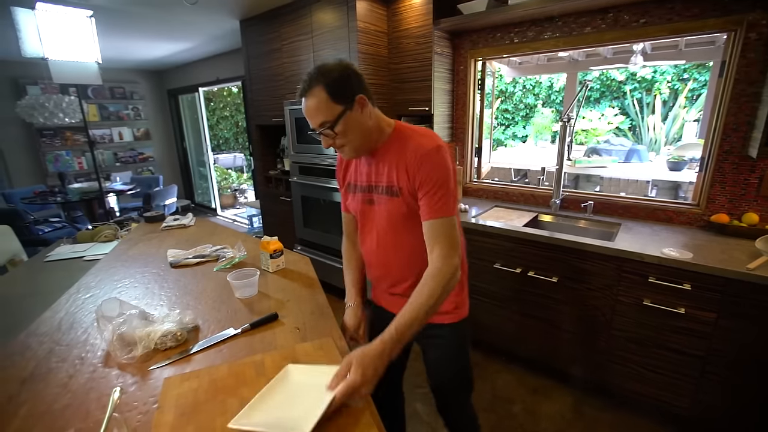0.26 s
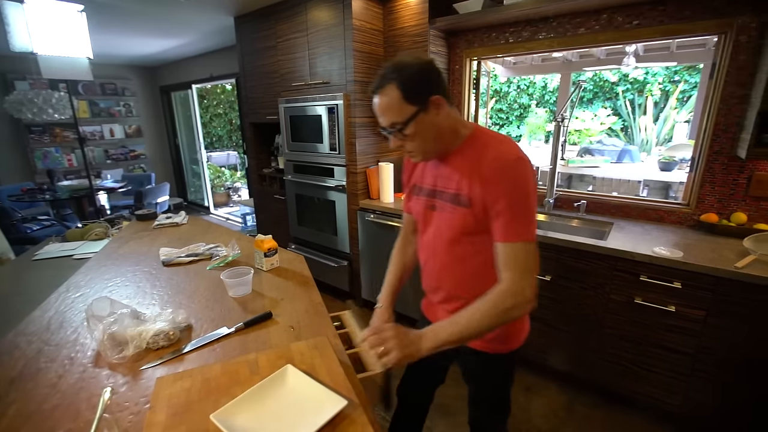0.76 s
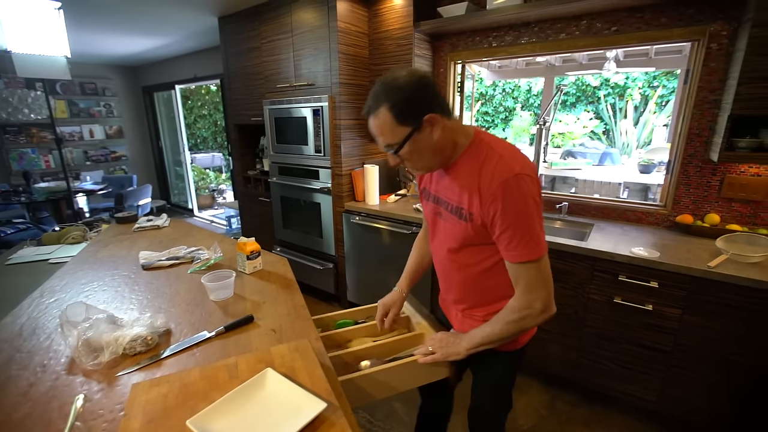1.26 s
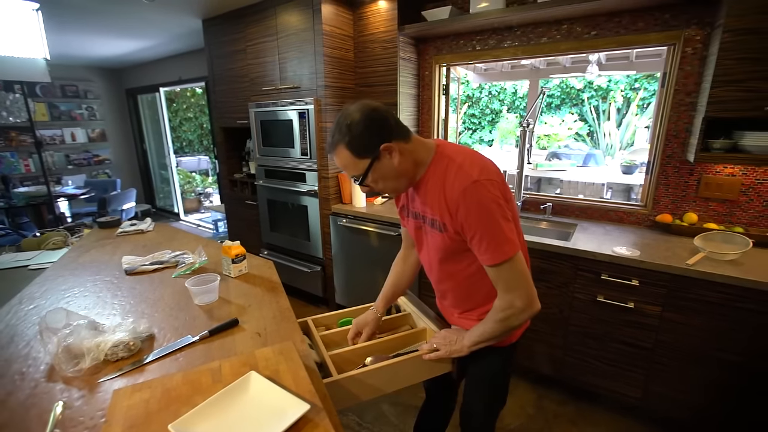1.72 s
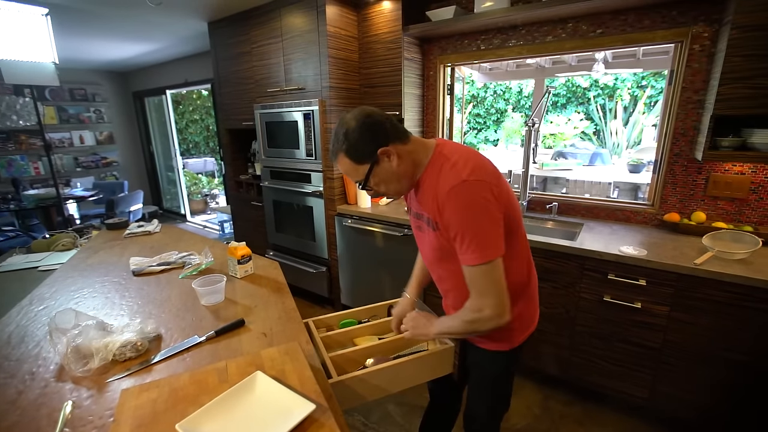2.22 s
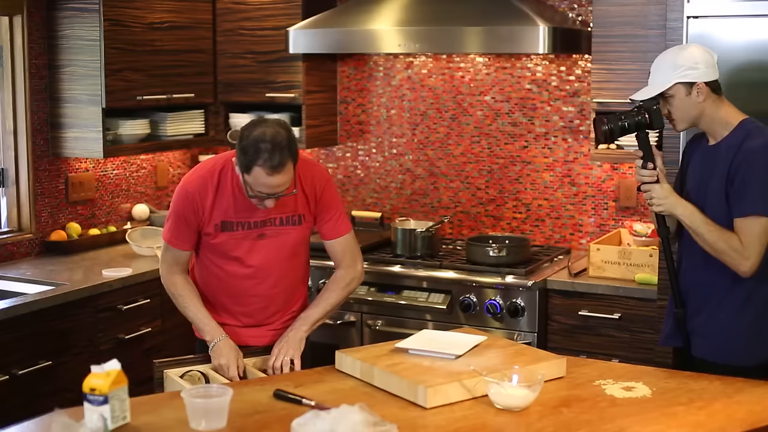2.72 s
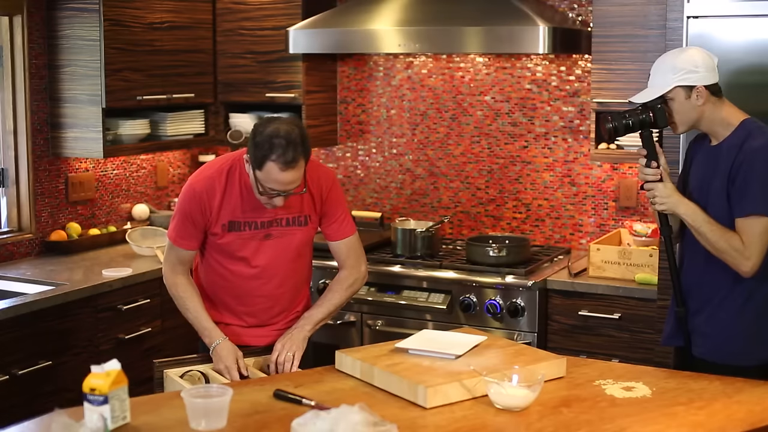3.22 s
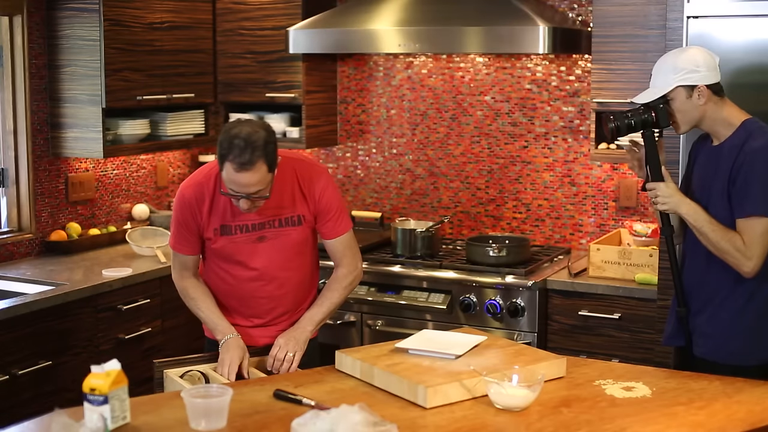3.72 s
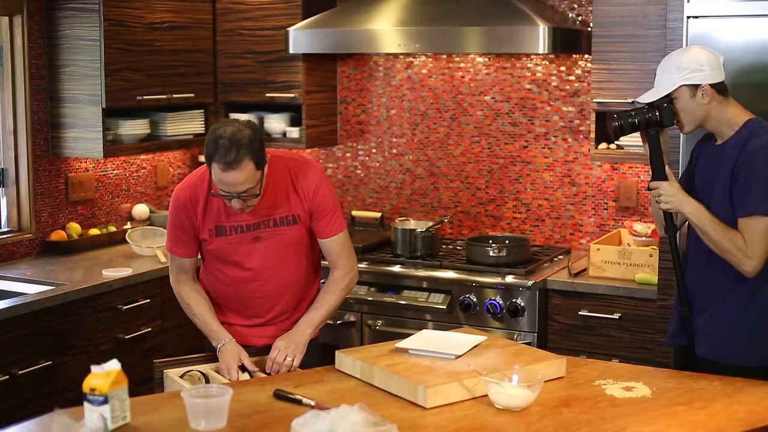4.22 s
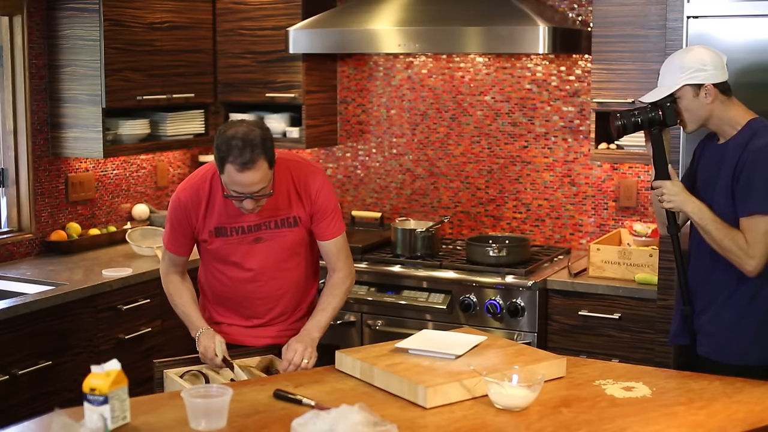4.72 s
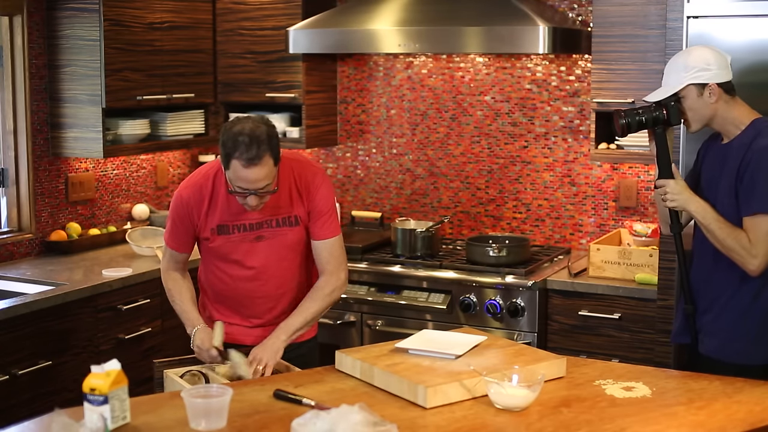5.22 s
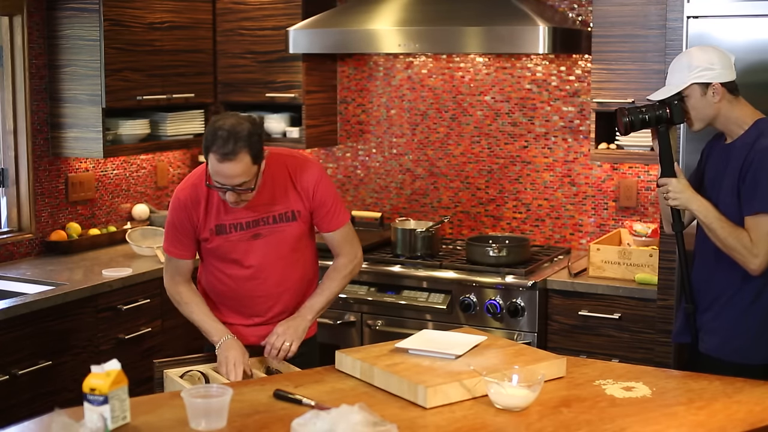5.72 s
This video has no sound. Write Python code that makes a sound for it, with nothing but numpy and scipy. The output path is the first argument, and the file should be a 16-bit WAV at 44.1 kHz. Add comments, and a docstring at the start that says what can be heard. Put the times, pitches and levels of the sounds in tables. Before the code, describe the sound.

Close, dry kitchen rummaging: a two-part plate clunk, a rolling drawer, then increasingly busy clatter of wooden, plastic and steel utensils with loud late knocks.

```python
"""Over faint room noise, a plate lands on a wooden kitchen counter, one edge and then the other: fading tones.
A drawer then rolls open: rough noise for the rumble and hiss, and a wavering tone for the bearings.
A hand rummages among wooden, plastic and steel utensils: short knocks and strokes of rubbing noise.
Late on, a big utensil rings from three blows, with a thud on the drawer between them.
A modest kitchen echo surrounds it all, and a close clip-on microphone overloads on the hardest knocks."""
import sys
import numpy as np
from scipy import signal
from scipy.fft import rfft, irfft, next_fast_len
from scipy.io import wavfile
from scipy.ndimage import uniform_filter1d

SR = 44100
rng = np.random.default_rng(int(sys.argv[2]) if len(sys.argv) > 2 else 0)


def waveform_to_disk(signal):
    """Save audio, clipped to [-1, 1], as 16-bit WAV at the path in sys.argv[1]."""
    frames = np.transpose(np.atleast_2d(signal))
    scaled = np.clip(frames, -1, 1) * 32767
    samples = np.round(scaled).astype(np.int16)
    wavfile.write(sys.argv[1], SR, samples)


N = 262659

# In the tables, "fade" is the time a sound takes to drop by 60 dB.
# Steady room noise, as a spectrum: (pitch [Hz], relative level [dB])
ROOM_TONE = [(15, -26), (25, 5), (108, 1), (149, 5), (190, -0.5), (775, -12.5), (911, -12), (1940, -18),
             (2760, -21), (4870, -20.5), (7920, -18.5), (14800, -37), (16000, -30)]
ROOM_TONE_DB = -59
# The plate landing, one edge and then the other: (time [s], level [dB], contact brightness [Hz])
PLATE_HITS = [(0.012, -3.5, 2400), (0.2725, -5.5, 3400)]
# Tones of the plate on the counter: (pitch [Hz], relative level [dB], fade before scaling [s])
PLATE_TONES = [(505, -24, .12), (834, -20, .06), (964, -15, .08), (1089, -11.5, .07), (1190, -19, .07),
               (1518, -21, .06), (1625, -13, .055), (1665, -15, .07), (1720, -17, .08), (2013, -21, .07),
               (2256, -17, .12), (2615, -15, .14), (2660, -11, .06), (2700, -17, .1), (2751, -19, .2),
               (3595, -29, .3), (4102, -27, .15), (7540, -14, .14)]
# Kitchen echo: (pitch [Hz], fade [s], relative level [dB])
KITCHEN_ECHO = [(150, 1, -12), (400, 0.41, -8), (950, 0.46, -7.5), (2670, 0.65, -16), (7000, .38, -15),
                (15000, 0.25, -15)]
# The drawer running out: (time [s], rumble level [dB], bearing hiss level [dB])
SLIDE = [(0.38, -53, -58), (0.47, -46, -55), (0.61, -44, -54.5), (0.72, -39, -47.5), (0.818, -47, -55),
         (0.954, -48, -57), (1.03, -53, -72), (1.33, -64, -86)]
# Whirr of the bearings: (time [s], pitch [Hz], level [dB])
WHIRR = [(0.42, 201.6, -72), (0.561, 259.4, -78), (0.68, 319.6, -46), (0.83, 335.6, -43.5),
         (0.951, 361, -46.5), (1.03, 400, -53), (1.15, 422.5, -63), (1.3, 417, -80)]
# Spectrum of the rolling rumble: (pitch [Hz], relative level [dB])
RUMBLE_COLOUR = [(59, -53), (100, -21), (205, -2.5), (271, -8), (336, -8), (761, -11.5), (973, -17.5),
                 (1490, -16.5), (5000, -32), (6500, -63.5), (11000, -120)]
# Spectrum of the bearing hiss: (pitch [Hz], relative level [dB])
HISS_COLOUR = [(1880, -24), (3200, -3.5), (4570, -2), (5270, -6.5), (6450, -3.5), (9530, -9), (12500, -5.5),
               (15200, -10), (16000, -19)]
# Utensils knocking on each other and the drawer, before small level trims:
# (time [s], level [dB], brightness [Hz], knock into the drawer [dB], ring pitch [Hz], chatter time [ms])
CONTACTS = [(0.562, -41.5, 7900.0, -44.0, 480.0, 3.8), (0.702, -19.5, 3600.0, -27.0, 1490.0, 3.0),
            (0.708, -29.0, 5600.0, -33.0, 520.0, 3.5), (1.336, -60.5, 2600.0, -54.0, 540.0, 3.0),
            (1.567, -45.0, 8300.0, -51.0, 3490.0, 2.9), (1.617, -36.0, 3900.0, -46.0, 2350.0, 1.4),
            (1.716, -32.0, 3000.0, -53.0, 2970.0, 2.3), (1.721, -26.5, 2700.0, -36.0, 760.0, 4.3),
            (1.778, -40.0, 6000.0, -45.0, 430.0, 4.9), (2.06, -37.5, 4700.0, -41.0, 1600.0, 1.8),
            (2.068, -32.0, 2600.0, -34.0, 400.0, 1.0), (2.159, -29.5, 4100.0, -34.0, 2760.0, 1.2),
            (2.265, -44.5, 5900.0, -43.0, 1840.0, 2.1), (2.306, -38.0, 3400.0, -48.0, 3000.0, 1.9),
            (2.368, -36.5, 2600.0, -37.0, 1330.0, 3.7), (2.388, -28.0, 1300.0, -33.0, 1520.0, 5.0),
            (2.407, -19.0, 1700.0, -33.0, 1680.0, 1.8), (2.418, -29.5, 2300.0, -37.0, 1670.0, 2.9),
            (2.564, -33.0, 8800.0, -36.0, 5310.0, 3.0), (2.619, -35.0, 8600.0, -41.0, 5340.0, 6.5),
            (2.634, -32.5, 8200.0, -31.0, 1020.0, 3.0), (2.751, -32.0, 4500.0, -38.0, 1640.0, 3.0),
            (2.764, -42.0, 9700.0, -53.0, 7450.0, 8.0), (2.842, -34.0, 2400.0, -46.0, 1540.0, 3.9),
            (2.875, -28.0, 2600.0, -44.0, 1650.0, 1.8), (2.904, -33.0, 9800.0, -36.0, 7300.0, 3.4),
            (2.913, -39.0, 7300.0, -35.0, 4100.0, 1.3), (2.975, -34.0, 4400.0, -41.0, 990.0, 4.1),
            (3.115, -56.0, 10900.0, -36.0, 430.0, 5.2), (3.147, -49.0, 12400.0, -63.0, 7400.0, 1.7),
            (3.199, -36.0, 8600.0, -60.0, 5340.0, 2.4), (3.225, -25.0, 5700.0, -40.0, 4350.0, 2.7),
            (3.279, -25.0, 10400.0, -31.0, 2950.0, 3.4), (3.316, -25.5, 8000.0, -33.0, 5250.0, 2.7),
            (3.388, -18.5, 2200.0, -56.0, 1830.0, 2.6), (3.463, -18.5, 1700.0, -35.0, 1780.0, 1.9),
            (3.579, -24.0, 2200.0, -34.0, 1200.0, 5.0), (3.604, -20.0, 2200.0, -34.0, 540.0, 3.0),
            (3.61, -25.0, 4900.0, -38.0, 5530.0, 2.6), (3.628, -30.0, 4600.0, -38.0, 1730.0, 3.5),
            (3.679, -25.5, 4200.0, -37.0, 2600.0, 2.6), (3.686, -24.0, 3500.0, -33.0, 1570.0, 1.8),
            (3.729, -37.0, 2600.0, -52.0, 1560.0, 3.4), (3.772, -40.0, 3800.0, -41.0, 1510.0, 4.2),
            (3.835, -53.5, 9900.0, -47.0, 6380.0, 2.0), (3.87, -34.0, 1900.0, -35.0, 1500.0, 2.0),
            (3.878, -28.5, 2300.0, -40.0, 440.0, 1.6), (3.935, -18.5, 2700.0, -29.0, 1210.0, 3.0),
            (3.945, -23.5, 2500.0, -27.0, 1560.0, 4.3), (3.965, -12.0, 3900.0, -31.0, 2650.0, 1.8),
            (3.987, -26.5, 3000.0, -54.0, 1630.0, 1.9), (4.071, -31.0, 5600.0, -31.0, 2660.0, 1.4),
            (4.133, -34.5, 5200.0, -49.0, 1470.0, 3.4), (4.151, -19.0, 3500.0, -39.0, 3310.0, 2.3),
            (4.166, -30.0, 4100.0, -53.0, 1840.0, 4.7), (4.273, -29.0, 3200.0, -46.0, 1560.0, 9.0),
            (4.398, -34.5, 3300.0, -46.0, 890.0, 4.0), (4.438, -29.0, 2200.0, -36.0, 910.0, 2.4),
            (4.452, -35.5, 5700.0, -35.0, 4720.0, 2.8), (4.462, -30.0, 3000.0, -48.0, 2390.0, 4.8),
            (4.538, -25.0, 4600.0, -46.0, 1630.0, 6.2), (4.548, -28.5, 3500.0, -34.0, 1630.0, 2.1),
            (5.146, -8.5, 4300.0, -26.0, 2000.0, 2.7), (5.15, -10.0, 3800.0, -21.0, 1800.0, 2.6),
            (5.178, -21.5, 4900.0, -47.0, 2090.0, 4.7), (5.306, -10.5, 2000.0, -11.5, 460.0, 4.0),
            (5.334, -31.0, 3200.0, -24.0, 860.0, 2.0), (5.401, -27.0, 3100.0, -37.0, 2900.0, 1.9),
            (5.505, -13.0, 6000.0, -22.0, 5080.0, 1.9), (5.529, -18.5, 3700.0, -42.0, 3320.0, 1.9),
            (5.544, -29.5, 5400.0, -33.0, 3270.0, 3.0), (5.567, -17.0, 3100.0, -29.0, 1900.0, 2.4),
            (5.591, -26.5, 4100.0, -31.0, 3270.0, 3.7), (5.644, -28.0, 1600.0, -36.0, 760.0, 2.4),
            (5.884, -22.0, 2100.0, -33.0, 1170.0, 2.2), (5.894, -30.0, 6700.0, -36.0, 450.0, 6.7)]
# Edges of the low, mid, high, top and sparkle bands: (edge [Hz])
BAND_EDGES_HZ = [150, 700, 2500, 7000, 9500, 16000]
# Average spectrum of a contact: (pitch [Hz], relative level [dB])
CONTACT_COLOUR = [(150, -10.5), (400, -0.5), (700, -6.5), (1500, 19.5), (2700, 9.5), (4500, 5.5),
                  (7500, 7.5), (9500, -32.5), (16000, -40.5)]
# A contact grows toward the treble up to its brightness, then falls steeply.
# Its level is given at the reference pitch.
RISE_DB_PER_OCTAVE, ROLL_OFF_DB_PER_OCTAVE, REFERENCE_HZ = 4, 18, 3000
NOTE_DB = 3.5   # a utensil's strongest note, above the untrimmed level of its band
# Tones of the wooden drawer box: (pitch [Hz], relative level [dB], fade [s])
DRAWER_BOX = [(223.8, -3.5, .14), (291.7, -6, 0.2), (323, -4.5, 0.074), (432, -6, 0.15), (469, -8, 0.13),
              (534, -5, .11), (729, -12.5, 0.072), (892, -8.5, .07), (1022, -8, 0.075), (1233, -7, 0.064)]
# Strokes of the hand, dragging utensils along each other, before a trim of each level:
# (middle [s], length [s], rubbing level [dB], scratching level [dB])
STROKES = [(1.57, .1, -56, -54), (1.71, .08, -53, -56), (1.85, .2, -62, -65), (2.09, .09, -49, -62),
           (2.29, .26, -54, -64), (2.409, .04, -39, -55), (2.626, .04, -50, -43), (2.763, .025, -45, -36),
           (2.79, .2, -48, -50), (2.901, .029, -48, -39), (3.13, .14, -58, -56), (3.32, .2, -46, -52),
           (3.608, .051, -40, -43), (3.62, .4, -53, -54), (3.98, .11, -34, -41), (4.13, .2, -46, -53),
           (4.215, .08, -40, -43), (4.286, .058, -36.5, -44), (4.44, .16, -40, -48), (5.08, .18, -58, -61),
           (5.19, .09, -45, -52), (5.29, .06, -50, -45), (5.35, .12, -38, -51), (5.44, .07, -43, -41),
           (5.56, .18, -45, -58), (5.64, .05, -45, -49), (5.9, .18, -50, -53)]
# Spectrum of rubbing: (pitch [Hz], relative level [dB])
RUBBING_COLOUR = [(76, -68), (130, -9), (257, 7.5), (384, 2.5), (509, 3.5), (695, -12), (921, 6.5),
                  (1330, -5), (1550, -0.5), (1740, -9), (2380, -2), (2840, -5.5), (3450, -1), (3770, -5),
                  (4500, -45), (5850, -130), (9900, -120)]
# Spectrum of scratching: (pitch [Hz], relative level [dB])
SCRATCHING_COLOUR = [(1470, -72), (2500, 3), (3740, -27.5), (4020, 8.5), (6700, 2.5), (8730, -4),
                     (13300, -18), (16000, -37.5)]
# Resonances of the rubbed handles: (pitch [Hz], relative level [dB], fade [s])
HANDLES = [(915, -9.5, 0.02), (1570, -10, 0.042), (1847, -13, .05), (2000, -15.5, 0.094),
           (2620, -11.5, 0.075), (3165, -21, 0.034)]
# Light touches: level in a stroke of average strength, random spread of level, range of brightness
TOUCH_DB, TOUCH_SPREAD_DB, TOUCH_BRIGHTNESS_HZ = -44, 2.5, (1800, 7000)
TOUCH_FOLLOWS = .7   # share of a stroke's strength that its touches follow
# Clinks of a steel utensil: (time [s], level [dB], contact brightness [Hz])
STEEL_HITS = [(2.633, -35.5, 8000), (3.319, -25, 14900)]
# Tones of the steel utensil: (pitch [Hz], relative level [dB], fade before scaling [s])
STEEL_TONES = [(1047, -13, .16), (1132, -12, .16), (5245, -4, .13), (6314, -14, .11), (7346, -13, .1),
               (12050, -14, .18)]
# Blows on the big utensil: (time [s], level [dB], contact brightness [Hz])
BIG_HITS = [(5.147, -11, 4560), (5.505, -9, 7600), (5.529, -18.5, 7000)]
# Tones of the big utensil: (pitch [Hz], relative level [dB], fade [s])
BIG_TONES = [(650, -12, .14), (722, -16, .13), (1015, -17, .13), (1530, -17, .13), (1839, -20, .12),
             (2069, -19, .13), (2380, -17, .16), (2810, -16, .12), (3228, -12, .13), (3262, -11, .15),
             (4258, -17, .14), (4338, -11, .12), (4996, -17, .15), (5077, -11, .18), (6438, -17, .18),
             (7063, -15, .15)]
CEILING = .55        # overload level of the microphone's amplifier (full scale is 1)
CUTOFF_HZ = 16200    # nothing much is heard above this


def from_db(db):
    """Turn decibels into a gain."""
    return 10 ** (np.asarray(db) / 20)


def rms_one(x):
    """Scale a sound to an average (rms) strength of 1."""
    return x / np.sqrt(np.mean(x ** 2) + 1e-20)


def level_at_peak(x):
    """Rms strength of the loudest four milliseconds."""
    return np.sqrt(uniform_filter1d(x ** 2, size=176, mode="constant").max() + 1e-20)


def butter(x, hz, kind, order=2):
    """Filter a sound with a smooth Butterworth filter that never looks ahead."""
    sos = signal.butter(order, np.clip(hz, 10, .45 * SR), kind, fs=SR, output="sos")
    return signal.sosfilt(sos, x + 1e-18)


def at_hz(points, hz, axis=1):
    """Read a table column between its pitches, spacing pitch by octaves."""
    points = np.array(points)
    return np.interp(np.log(np.maximum(hz, 1)), np.log(points[:, 0]), points[:, axis])


def gains_in_time(rows, fade_s=.12):
    """Turn level columns into gain curves that fade to silence before and after."""
    s, *columns = np.transpose(rows)
    s = np.r_[s[0] - fade_s, s, s[-1] + fade_s]
    return [np.interp(np.arange(N) / SR, s, np.r_[0, from_db(c), 0]) for c in columns]


def coloured(x, spectrum):
    """Shape a steady texture with a spectrum and scale it to rms 1."""
    size = next_fast_len(N)
    gain = from_db(at_hz(spectrum, np.fft.rfftfreq(size, 1 / SR)))
    return rms_one(irfft(rfft(x, size) * gain, size)[:N])


def add(out, s, sound):
    """Mix a sound in at a time in seconds."""
    i = max(0, round(s * SR))
    out[i:i + len(sound)] += sound[:max(0, N - i)]


def ring(force, hz, t60):
    """One fading tone: a click of size 1 starts a sine of height 1, which drops 60 dB in t60 seconds."""
    r, w = 1000 ** (-1 / (t60 * SR)), 2 * np.pi * hz / SR
    return signal.lfilter([0, np.sin(w)], [1, -2 * r * np.cos(w), r * r], force + 1e-18)


def grains(per_s, spread_db):
    """Friction: random tiny slips of very uneven size."""
    sizes = from_db(spread_db * np.minimum(rng.exponential(1, N), 4)) * rng.choice([-1, 1], N)
    return rms_one(sizes * (rng.random(N) < per_s / SR))


def room_tone():
    """Steady quiet noise with the spectrum of the room."""
    return from_db(ROOM_TONE_DB) * coloured(rng.standard_normal(N), ROOM_TONE)


def struck(hits, modes, scatter_db, ring_db, sustain, knock_db, knock_t60, tick_db):
    """A struck object: its tones and a dense knock, dulled by a soft contact, plus a bright tick."""
    out, t = np.zeros(N), np.arange(SR // 2) / SR
    for s, level_db, bright_hz in hits:
        knock = butter(rng.standard_normal(len(t)), [600, bright_hz], "band")
        sound = from_db(knock_db - 60 * t / knock_t60) * knock
        for hz, db, t60 in modes:
            # each blow excites the tones a little differently
            tone_db = ring_db + db + rng.normal(0, scatter_db)
            fading = from_db(tone_db - 60 * t / (sustain * t60))
            sound += fading * np.sin(2 * np.pi * hz * t + rng.uniform(0, 2 * np.pi))
        tick_noise = butter(rng.standard_normal(len(t)), 2 * bright_hz, "low", order=1)
        tick = from_db(tick_db - 60 * t / .004) * tick_noise
        dulled = butter(sound, bright_hz, "low", order=4)
        add(out, s, from_db(level_db) * (dulled + tick))
    return out


def plate_landing():
    """The plate rings briefly as each edge meets the counter."""
    return struck(PLATE_HITS, PLATE_TONES, scatter_db=1.3, ring_db=1, sustain=0.93,
                  knock_db=1, knock_t60=0.065, tick_db=-22.5)


def kitchen(x, build_s=0.0042):
    """Scattered reflections swell after the direct sound and fade at a rate set by pitch."""
    t, response = np.arange(int(.8 * SR)) / SR, 0
    edges = np.geomspace(90, 17000, 11)
    for low, high in zip(edges, edges[1:]):
        hz = np.sqrt(low * high)
        swell = 1 - np.exp(-(t / build_s) ** 2)
        decay = from_db(-60 * t / at_hz(KITCHEN_ECHO, hz)) * swell
        noise = butter(rng.standard_normal(len(t)), [low, high], "band")
        gain = from_db(at_hz(KITCHEN_ECHO, hz, axis=2))
        response = response + gain * noise * decay / np.linalg.norm(decay)
    return signal.fftconvolve(x, response)[:N]


def drawer_slide(waver_hz=14):
    """Ball bearings rumble and hiss along the rails, and their whirr climbs as the drawer gathers speed."""
    rumble, hiss = gains_in_time(SLIDE)
    s, hz, db = np.transpose(WHIRR)
    phase = 2 * np.pi * np.cumsum(np.interp(np.arange(N) / SR, s, hz)) / SR
    # two slow random curves make the whirr waver
    uneven = [rms_one(butter(rng.standard_normal(N), waver_hz, "low")) for _ in range(2)]
    wavering = uneven[0] * np.cos(phase) + uneven[1] * np.sin(phase)
    whirr = gains_in_time(np.c_[s, db])[0] * wavering
    rolling = rumble * coloured(grains(3000, 1.6), RUMBLE_COLOUR)
    hissing = hiss * coloured(grains(12000, 3.4), HISS_COLOUR)
    return whirr + rolling + hissing


def chatter(ms, per_s=4000, rebound=0.74, settle_db=-19, settle_ms=11, size=4000):
    """Force of one touch: a click, a run of rebounds, then the neighbours settling; total energy 1."""
    t_ms = 1000 * np.arange(size) / SR
    age = t_ms / max(ms, .5)
    settling = from_db(settle_db) * np.exp(-t_ms / settle_ms)
    strength = (1 + 2 * age) * np.exp(-1.5 * age) + settling
    force = rebound * rng.standard_normal(size) * (rng.random(size) < per_s / SR) * strength
    force[0] = 1
    return force / np.linalg.norm(force)


def utensil(force, t60=0.015, t60_spread=0.16, crack=0.42, crack_hz=6000, count=90):
    """A utensil damped by the pile: many short tones, different for each contact, and a dry crack."""
    roots = np.linspace(np.sqrt(BAND_EDGES_HZ[0]), np.sqrt(BAND_EDGES_HZ[-1]), count)
    pitches = roots ** 2 * np.exp(rng.normal(0, 0.029, count))
    # t60 is the fade at 2000 Hz; higher tones fade sooner
    decays = t60 * (pitches / 2000) ** -.25 * np.exp(t60_spread * rng.uniform(-1, 1, count))
    strengths = rng.uniform(-1.02, 1, count) * from_db(at_hz(CONTACT_COLOUR, pitches))
    body = sum(g * ring(force, hz, decay) for g, hz, decay in zip(strengths, pitches, decays))
    return rms_one(body) + crack * rms_one(butter(force, crack_hz, "low", order=1))


def band_levels(level_db, bright_hz, knock_db):
    """Five band levels: the knock lowest, then a rise that rolls off above the brightness."""
    edges = np.array(BAND_EDGES_HZ[1:])
    hz = np.sqrt(edges[:-1] * edges[1:])
    roll_off = 10 * np.log10(1 + 10 ** (ROLL_OFF_DB_PER_OCTAVE * np.log2(hz / bright_hz) / 10))
    rise = RISE_DB_PER_OCTAVE * np.log2(hz / REFERENCE_HZ)
    return np.r_[knock_db, level_db + rise - roll_off]


def clatter(contacts, band_db=(-1, 0, 0, -0.5, 0.5), box_db=-5):
    """Each contact sounds a utensil, its strongest note and the drawer box beneath."""
    out, into_box = np.zeros(N), np.zeros((len(DRAWER_BOX), N))
    bands = [signal.butter(3, edges, "band", fs=SR, output="sos")
             for edges in zip(BAND_EDGES_HZ, BAND_EDGES_HZ[1:])]
    for s, level_db, bright_hz, knock_db, ring_hz, ms in contacts:
        force = chatter(ms)
        body = utensil(force)
        levels_db = band_levels(level_db, bright_hz, knock_db)
        for sos, db, trim_db in zip(bands, levels_db, band_db):
            part = signal.sosfilt(sos, body)
            add(out, s, from_db(db + trim_db) * part / level_at_peak(part))
        # low notes last longer
        note = ring(force, ring_hz, .03 * (ring_hz / 3000) ** -.4)
        note_db = levels_db[np.digitize(ring_hz, BAND_EDGES_HZ[1:-1])] + NOTE_DB
        add(out, s, from_db(note_db) * note / np.abs(note).max())
        # the spot that is struck decides how strongly each box tone answers
        for drive in into_box:
            push = from_db([knock_db + box_db + rng.normal(0, 0.97)])
            add(drive, s, push * rng.choice([-1, 1]))
    box = sum(from_db(db) * ring(drive, hz, t60) for drive, (hz, db, t60) in zip(into_box, DRAWER_BOX))
    return out + box


def rummaging(rub_db=-2.5, scratch_db=-2, catch_db=4.0, catch_hz=35):
    """Handles rub and scratch in swelling strokes, catching and slipping in clumps."""
    rub, scratch = 0, 0
    for s, length, rubbing_db, scratching_db in STROKES:
        stroke = np.exp(-(2 * (np.arange(N) / SR - s) / length) ** 2)
        rub = rub + from_db(rubbing_db) * stroke
        scratch = scratch + from_db(scratching_db) * stroke
    clumps = rms_one(butter(rng.standard_normal(N), catch_hz, "low"))
    catching = from_db(catch_db * np.clip(clumps, -2, 2))
    slips = catching * grains(9000, 5.1)
    handles = sum(from_db(db) * rms_one(ring(catching * grains(1300, 2.5), hz, t60))
                  for hz, db, t60 in HANDLES)
    rubbing = coloured(slips, RUBBING_COLOUR) + handles
    scratching = coloured(slips, SCRATCHING_COLOUR)
    return from_db(rub_db) * rub * rubbing + from_db(scratch_db) * scratch * scratching


def light_touches(knock_db=-3, ring_share=.55, ms=2.6, count=44):
    """Small contacts at random in the strokes, likelier in long ones, louder in strong; rows like CONTACTS."""
    strokes = np.array(STROKES)
    chance = strokes[:, 1] / strokes[:, 1].sum()
    s, length, rubbing_db, _ = strokes[rng.choice(len(strokes), count, p=chance)].T
    s = s + length * rng.uniform(-.5, .5, count)
    stronger_db = rubbing_db - strokes[:, 2].mean()
    level_db = TOUCH_DB + TOUCH_FOLLOWS * stronger_db + rng.normal(0, TOUCH_SPREAD_DB, count)
    bright_hz = np.exp(rng.uniform(*np.log(TOUCH_BRIGHTNESS_HZ), count))
    return list(zip(s, level_db, bright_hz, level_db + knock_db, ring_share * bright_hz, np.full(count, ms)))


def steel_clinks():
    """A steel utensil clinks with a few clear tones and a tick."""
    return struck(STEEL_HITS, STEEL_TONES, scatter_db=0.0, ring_db=1, sustain=0.66,
                  knock_db=-15, knock_t60=.03, tick_db=-8)


def big_utensil_blows():
    """The big utensil rings with many tones at each blow."""
    return struck(BIG_HITS, BIG_TONES, scatter_db=2.5, ring_db=1, sustain=1.0,
                  knock_db=-2.5, knock_t60=.11, tick_db=-20)


def scene(plate_room_db=3):
    """Everything in the room; the plate, farther from the microphone, gets more echo."""
    air = room_tone()
    plate = plate_landing()
    utensils = clatter(list(CONTACTS) + light_touches()) + steel_clinks() + big_utensil_blows()
    drawer = drawer_slide() + utensils + rummaging()
    echo = kitchen(drawer + from_db(plate_room_db) * plate)
    return (air + plate + drawer + echo)[None]


def record(dry, thump_db=7, emphasis_hz=3500, thump_hz=(17, 42)):
    """The microphone's amplifier flattens peaks and turns bright bursts into a deep thump."""
    held = np.clip(dry, -CEILING, CEILING)
    # taking the size of the treble, without its sign, leaves a slow push
    bright = np.abs(butter(held, emphasis_hz, "high", order=1))
    thump = butter(bright, thump_hz, "band", order=1)
    thump = from_db(thump_db) * butter(thump, 15, "high")
    out = np.clip(held + thump, -CEILING, CEILING)
    return signal.sosfilt(signal.ellip(10, .1, 80, CUTOFF_HZ, fs=SR, output="sos"), out)


dry = scene()
out = record(dry)
waveform_to_disk(out)
```